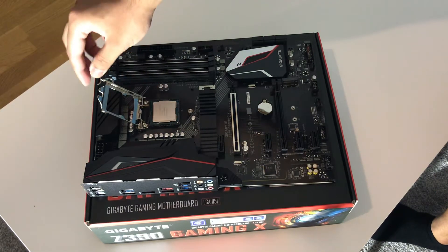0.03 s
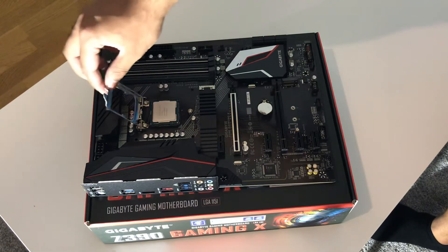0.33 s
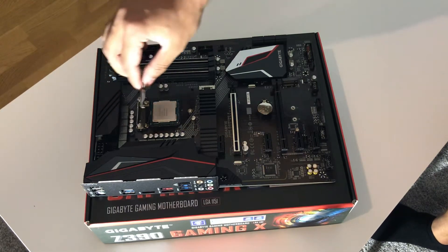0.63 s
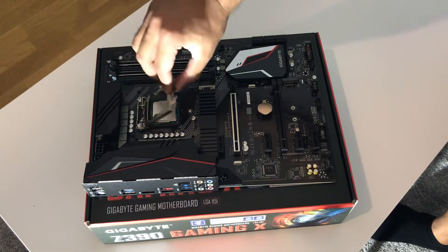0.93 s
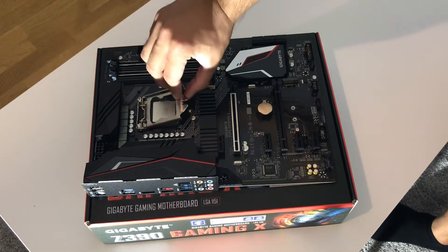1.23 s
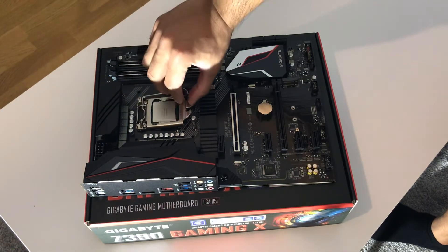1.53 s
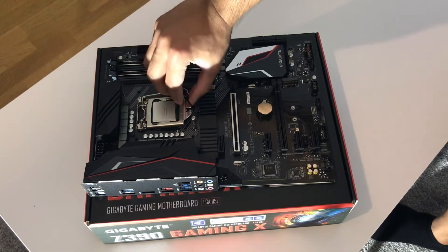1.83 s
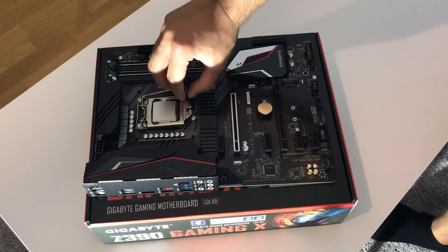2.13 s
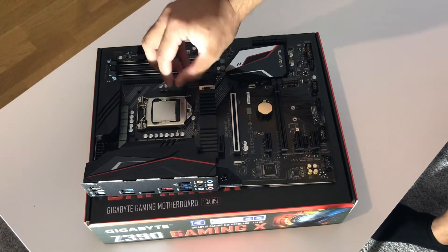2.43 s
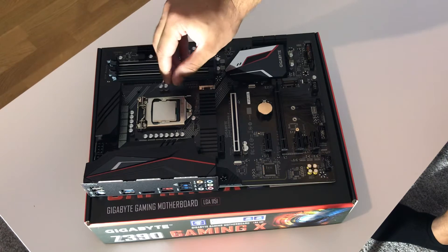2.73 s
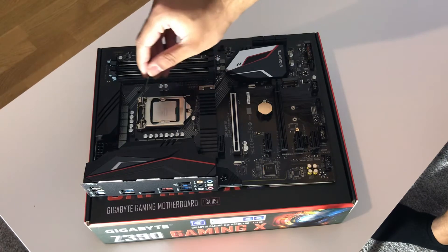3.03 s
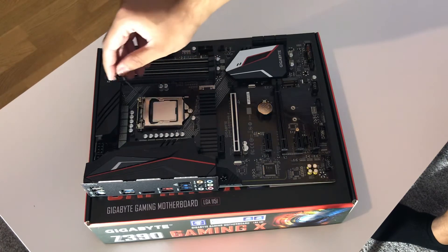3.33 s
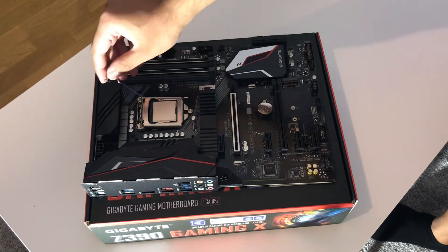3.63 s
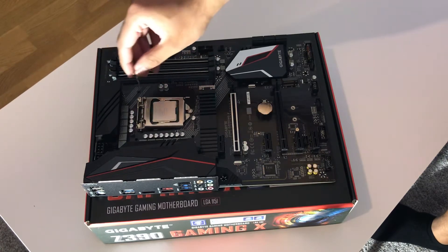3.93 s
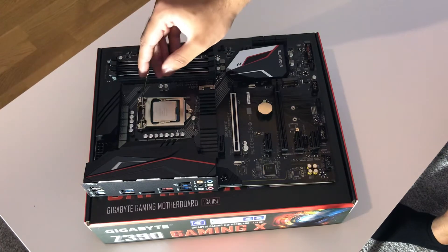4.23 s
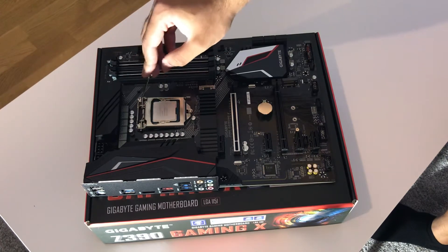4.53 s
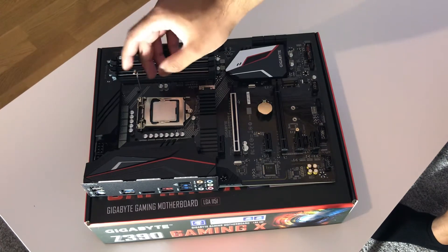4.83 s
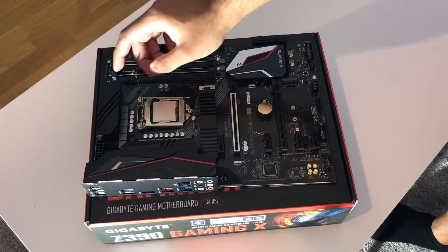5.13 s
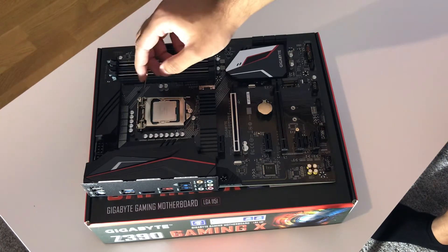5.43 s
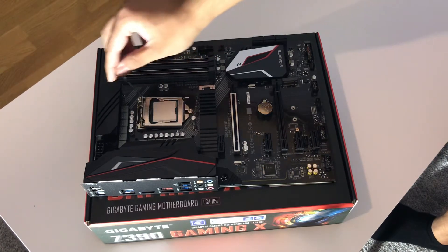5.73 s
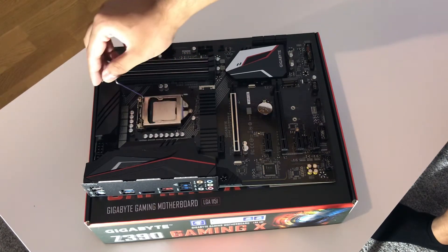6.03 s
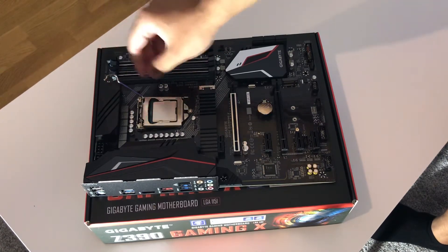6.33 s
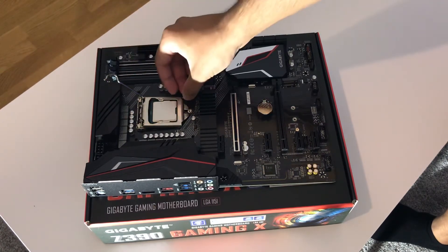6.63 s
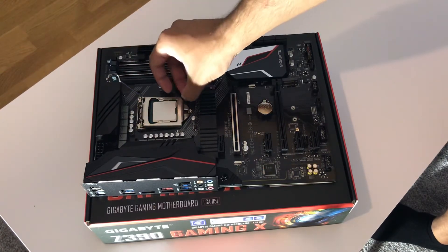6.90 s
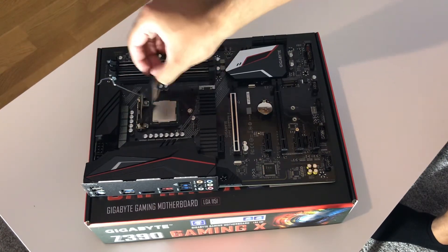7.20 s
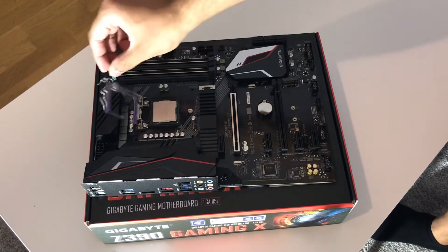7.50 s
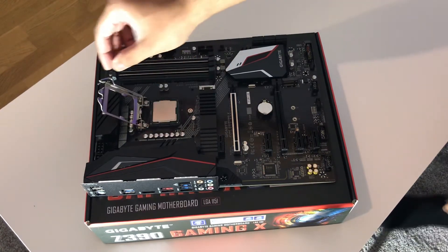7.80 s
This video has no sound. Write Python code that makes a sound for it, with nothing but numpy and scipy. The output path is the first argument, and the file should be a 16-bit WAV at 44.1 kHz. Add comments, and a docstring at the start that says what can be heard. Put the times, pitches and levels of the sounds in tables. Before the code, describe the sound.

Light metal clicks and snaps of a processor socket's plate and lever, worked by hand in a small quiet room.

```python
"""The steel plate and wire lever of a processor socket click and snap as a hand works them.
Each contact is a short chatter of tiny impacts that rings the plate, the lever and the circuit board.
The plate rubs in its hinge and finally swings open against its stop. Fingertips knock softly on the
board, and some blows boom in the cardboard box under it. One microphone hears it all in a small,
quiet room with a faint electronic whine."""
import sys
import numpy as np
from scipy import signal
from scipy.fft import rfft, irfft, next_fast_len
from scipy.io import wavfile
from scipy.ndimage import uniform_filter1d

SR = 44100
rng = np.random.default_rng(int(sys.argv[2]) if len(sys.argv) > 2 else 0)


def bounce(signal):
    """Save signal as a 16-bit WAV file at the path given by the first command-line argument."""
    frames = np.transpose(np.atleast_2d(signal))
    limited = np.clip(frames, -1, 1)
    pcm = np.round(limited * 32767).astype(np.int16)
    wavfile.write(sys.argv[1], SR, pcm)


N = 355490
RING_SAMPLES = 8192  # length of one ring of the steel or the board
TOP_HZ = 15900  # upper edge of the clicks and of the recorder


def undb(db):
    """Turn decibels into a number to multiply by."""
    return 10 ** (np.asarray(db) / 20)


def unit(x):
    """Scale each row to an average (rms) level of 1."""
    return x / np.sqrt(np.mean(x ** 2, axis=-1, keepdims=True))


def colour(x, points):
    """Make lows and highs louder or softer along a curve of (pitch_hz, level_db) points."""
    hz, db = np.transpose(points)
    freqs = np.maximum(np.fft.rfftfreq(len(x), 1 / SR), 1)
    gain = undb(np.interp(np.log(freqs), np.log(hz), db))
    return irfft(rfft(x) * gain, len(x))


def fade(t, ring_s):
    """A free vibration dies away, losing 60 dB in ring_s seconds."""
    return np.exp(-np.log(1000) * t / ring_s)


def even(x, width_hz):
    """Spread a burst's energy evenly from low to high, keeping only ripples finer than width_hz."""
    spectrum = rfft(x, 2 * len(x))
    width_bins = max(1, int(width_hz * 2 * len(x) / SR))
    power = uniform_filter1d(np.abs(spectrum) ** 2, width_bins)
    return irfft(spectrum / np.sqrt(np.abs(power) + 1e-12))[:len(x)]


def dying_noise(points, low_ring_s, high_ring_s, size):
    """Countless overlapping tones blur into noise; lows and highs each fade at their own rate."""
    t = np.arange(size) / SR
    freqs = np.fft.rfftfreq(size, 1 / SR)
    spectrum = rfft(rng.standard_normal(size))
    edges_hz = np.r_[0, np.geomspace(150, SR / 2, 8)]
    ring_times = np.geomspace(low_ring_s, high_ring_s, len(edges_hz) - 1)
    ring = sum(irfft(spectrum * (freqs >= low) * (freqs < high), size) * fade(t, ring_s)
               for low, high, ring_s in zip(edges_hz, edges_hz[1:], ring_times))
    flat = even(ring, width_hz=130)
    return colour(np.pad(flat, (0, size)), points)[:size]


def ringing_tones(pitch_hz, gain, ring_s, count, scatter_db, detune=0.0037):
    """An object's own fading tones, one row per blow: each spot that is hit mixes them differently."""
    t = np.arange(RING_SAMPLES) / SR
    detuned_hz = pitch_hz * (1 + detune * rng.standard_normal(len(pitch_hz)))
    tones = np.exp(2j * np.pi * detuned_hz[:, None] * t) * fade(t, ring_s[:, None])
    chance = rng.standard_normal((count, len(pitch_hz), 2))
    strength = gain * undb(scatter_db * chance[..., 0])
    phase = np.exp(2j * np.pi * chance[..., 1])
    return ((strength * phase) @ tones).imag


def stroke(start_s, length_s):
    """Pressure that swells and lets go."""
    return np.sin(np.pi * np.clip((np.arange(N) / SR - start_s) / length_s, 0, 1))


def slips(per_s, uneven_db):
    """Rubbing surfaces stick and slip, making many random ticks of uneven size."""
    ticks = (rng.random(N) < per_s / SR) * rng.standard_normal(N)
    return ticks * undb(uneven_db * rng.standard_normal(N))


def background(air_db=-67, whine_db=-85, whine_hz=11865, waver_hz=35, whine_end_s=6.5):
    """Steady room air and hiss, with a thin electronic whine that wavers in pitch and fades out."""
    # tone colour of room air and microphone hiss: pitch_hz, level_db
    air_colour = [(22, -43.5), (35, -14), (55, -4), (110, -3), (170, -4.5), (330, -8.5), (600, -15.5),
                  (1200, -17.5), (3000, -22.5), (6000, -26.5), (9500, -28.5), (10700, -32), (12000, -26),
                  (16000, -31.5)]
    air = unit(colour(rng.standard_normal(next_fast_len(N)), air_colour))[:N]
    slow_filter = signal.butter(2, 20, fs=SR, output="sos")
    waver = unit(signal.sosfilt(slow_filter, rng.standard_normal(N)))
    whine = unit(np.sin(2 * np.pi * np.cumsum(whine_hz + waver_hz * waver) / SR))
    fade_out = np.clip(2 * (whine_end_s - np.arange(N) / SR), 0, 1)
    return undb(air_db) * air + undb(whine_db) * whine * fade_out


def room(x, echo_db=-4, build_s=0.003):
    """The desk and near walls answer within milliseconds, then blur into a short echo."""
    # tone colour of the echo: pitch_hz, level_db
    echo_colour = [(60, 0), (150, 4), (300, 0), (700, 3), (1500, 0), (3500, -7), (7000, -3.5), (16000, -15)]
    tail = dying_noise(echo_colour, low_ring_s=0.49, high_ring_s=0.31, size=SR // 2)
    t = np.arange(len(tail)) / SR
    tail *= 1 - np.exp(-(t / build_s) ** 2)
    return x + undb(echo_db) * signal.fftconvolve(x, tail)[:N]


def box_boom():
    """Some blows pass through the board and make the hollow cardboard box boom."""
    # the box's low tones: pitch_hz, level_db, ring_s
    box_tones = [(150, 1, 0.2), (208.2, -2, 0.39), (282, 2.5, 0.13)]
    # blows that shake the whole box: start_s, level_db
    thumps = [(0.776, -61), (3.332, -51), (3.618, -56.5), (7.516, -43)]
    out = np.zeros(N + SR)
    t = np.arange(SR // 2) / SR
    boom = sum(undb(db) * np.sin(2 * np.pi * hz * t) * fade(t, ring_s) for hz, db, ring_s in box_tones)
    for start_s, level_db in thumps:
        at = int(start_s * SR)
        out[at:at + len(t)] += undb(level_db) * boom
    return out[:N]


def fingers(sharpness=2.4):
    """Soft skin stirs only one low, hollow tone of the board."""
    # fingertip knocks and rubs: start_s, length_s, pitch_hz, level_db
    touches = [(0.336, 0.045, 388, -50), (0.862, 0.072, 367, -68.5), (1.292, 0.028, 414, -59),
               (1.501, 0.044, 353, -61), (1.69, 0.14, 418, -66), (6.441, 0.033, 375, -49),
               (6.721, 0.039, 390, -60), (7.184, .025, 400, -52.5), (7.235, 0.067, 300, -50.5)]
    skin = slips(per_s=470, uneven_db=-2.0)
    out = np.zeros(N)
    for start_s, length_s, pitch_hz, level_db in touches:
        peak = signal.iirpeak(pitch_hz, sharpness, fs=SR)
        hollow = signal.lfilter(*peak, signal.lfilter(*peak, skin))
        out += undb(level_db) * stroke(start_s, length_s) * unit(hollow)
    return out


def scraping(ring_s=0.026):
    """Steel slides on steel, and each tiny slip rings the plate briefly."""
    # slides in the hinge and latch: start_s, length_s, level_db
    scrapes = [(0.3, 0.15, -61), (0.614, 0.18, -57), (2.668, 0.11, -63), (4.756, 0.065, -58),
               (5.191, 0.056, -49.5), (5.535, 0.092, -61), (7.16, 0.097, -61), (7.244, 0.65, -61.5)]
    # tone colour of the sliding steel: pitch_hz, level_db
    rasp_colour = [(300, -3), (2500, -6), (3250, -2.5), (3700, 2), (4200, -8.5), (4750, -11.5),
                   (6000, -17.5), (8400, -11), (10000, -32), (13000, -13.5)]
    pressure = sum(undb(db) * stroke(start_s, length_s) for start_s, length_s, db in scrapes)
    ring = dying_noise(rasp_colour, low_ring_s=ring_s, high_ring_s=ring_s, size=RING_SAMPLES)
    rasp = signal.fftconvolve(slips(per_s=1900, uneven_db=4.5), ring)[:N]
    return pressure * unit(rasp)


def free_plate(shimmer_db=31):
    """Hanging free, the thin plate rings on after a jolt: a few bright tones in a dense shimmer."""
    # jolts to the plate: start_s, level_db
    jolts = [(.225, -62), (3.327, -50), (7.231, -47), (7.51, -25)]
    # the plate's bright tones: pitch_hz, level_db, ring_s
    plate_tones = [(1830, -9, 0.11), (2090, -4, 0.059), (3430, -12.5, 0.086), (4120, -5.5, 0.082),
                   (7450, -10, .08), (9000, -13, .08), (11540, -3.5, 0.1), (12600, -1.5, .08),
                   (13600, -6, .06), (14700, 5, .065)]
    # tone colour of the shimmer between them: pitch_hz, level_db
    shimmer_colour = [(3000, -18), (5000, -1), (9500, -8), (11000, -6.5), (11900, 5), (15000, -1.5),
                      (16000, -12.5)]
    out = np.zeros(N + RING_SAMPLES)
    pitch_hz, level_db, ring_s = np.transpose(plate_tones)
    rings = ringing_tones(pitch_hz, undb(level_db), ring_s, len(jolts), scatter_db=2.5, detune=0.0005)
    for (start_s, jolt_db), ring in zip(jolts, rings):
        shimmer = dying_noise(shimmer_colour, low_ring_s=0.18, high_ring_s=0.15, size=RING_SAMPLES)
        at = int(start_s * SR)
        out[at:at + RING_SAMPLES] += undb(jolt_db) * (ring + undb(shimmer_db) * shimmer)
    return out[:N]


def socket_ring(count, tones_db=-1):
    """The clamped socket and board answer each blow with a crack and a few clear tones."""
    # tones that stand out of the crack: pitch_hz, peak_db, ring_s
    socket_tones = [(208.8, 2.5, 0.43), (271.4, 0.5, 0.12), (387, 6.5, 0.058), (632, 0, 0.044),
                    (1035, 5, 0.048), (1592, 3.5, 0.11), (2044, 6.5, 0.012), (2074, 2, 0.02),
                    (2246, 7, 0.023), (2923, -1, 0.028), (3270, 1, 0.069), (3460, 9.5, 0.04),
                    (3632, 8, 0.019), (3880, 3, 0.012), (8530, -4, 0.024)]
    # tone colour of the crack, a crowd of quickly dying tones: pitch_hz, level_db
    crack_colour = [(100, -22), (260, -2.5), (540, -5), (1000, -2.5), (1350, -2.5), (2100, 2.5),
                    (2550, -4.5), (3650, 3.5), (4800, -6.5), (6400, -14.5), (8500, -14), (10700, -19),
                    (12500, -15.5), (16000, -17)]
    pitch_hz, peak_db, ring_s = np.transpose(socket_tones)
    # a longer ring needs less strength to reach the same peak in the spectrum
    gain = undb(peak_db + tones_db) * 2 * np.log(1000) / (ring_s * SR)
    cracks = np.array([dying_noise(crack_colour, low_ring_s=0.11, high_ring_s=0.013, size=RING_SAMPLES)
                       for _ in range(count)])
    return cracks + ringing_tones(pitch_hz, gain, ring_s, count, scatter_db=3.5)


def split_parts(x):
    """Split a sound into five equally strong ranges, low to high: box, board, lever, plate, tick."""
    edges_hz = (60, 480, 1300, 2700, 6000, TOP_HZ)
    filters = [signal.butter(3, band, "bandpass", fs=SR, output="sos")
               for band in zip(edges_hz, edges_hz[1:])]
    return [unit(signal.sosfilt(band_filter, x)) for band_filter in filters]


def chatter(chatter_s, first_blow=1.03, bounces=24):
    """A first blow with tiny bounces crowding behind it; a larger chatter_s spreads them out."""
    push = np.zeros(RING_SAMPLES // 4)
    delays_s = rng.gamma(2, size=bounces) * chatter_s
    at = np.minimum(delays_s * SR, len(push) - 1).astype(int)
    np.add.at(push, at, rng.standard_normal(bounces))
    push[0] += first_blow
    return even(push, width_hz=56)


def single_clicks(earliest_s=0.02, latest_s=0.035, settle_db=-16):
    """A part clicks, then settles with one fainter tick a random moment later."""
    # contacts of plate, lever and latch: start_s, level_db, thud_db, lever_db, tick_db, chatter_s
    contacts = [(0.2254, -51, -5.5, -10, -15, 0.00034), (0.2658, -55.5, -2, -3.5, -19, 0.00022),
                (0.3803, -63, 7, 0, -1.5, 0.0011), (0.7441, -56.5, .5, -0.5, -6, 0.0027),
                (0.7716, -57.5, -9, -5, -22, .0004), (1.0995, -63.5, 0.5, 3, -6, 0.00041),
                (1.539, -66.5, 1, -2, -3, 0.0032), (2.04, -58, -7, -7, -5.5, .0005),
                (2.09, -64.5, -14, -4.5, -22, 0.00076), (2.3929, -60.5, 6, -1.5, -1.5, 0.0021),
                (2.485, -65, 6.5, 5, -1.5, .0028), (2.6806, -57, -2.5, -5, -6, 0.00084),
                (2.7353, -65.5, 6, 6.5, -8, 0.00038), (2.7806, -59, -6.5, -4, -8, 0.00044),
                (2.802, -62.5, -4, -5, -6, .0003), (3.1253, -49.5, -2, 2, -2.5, 0.00064),
                (3.5924, -59, -1, -11, -7, .0008), (3.6092, -46.5, 0, 2.5, -9, .0022),
                (3.7317, -59.5, -0.5, 2.5, -3, .0018), (3.866, -63, 1, 5.5, -2.5, 0.00035),
                (3.9522, -57, -4, -15, -1.5, .0003), (4.0217, -56, 4.5, 1.5, -3.5, 0.00038),
                (4.7289, -60.5, -18, -17, -5, 0.00032), (4.759, -59, -3.5, 1, -6, .0008),
                (4.7929, -55, -3, -3, -7, 0.0019), (5.6424, -64.5, 6.5, -2, 0, 0.0012),
                (5.7644, -58, 1.5, -5, -4.5, 0.0014), (6.452, -55, 2, -1, -8.5, .0013),
                (6.7539, -67.5, 8.5, -1.5, -7, .0005), (6.8259, -54.5, -3.5, 3, -9.5, 0.00036),
                (7.1195, -58, 3.5, 3.5, 0.5, .0006), (7.205, -50.5, 1, 2, -3, 0.00096),
                (7.229, -39.5, -6, -4.5, -3.5, .0014), (7.3165, -60.5, 3.5, 3, -9, 0.00064),
                (7.386, -52.5, -1.5, -3, -6, .001), (7.4236, -52.5, -1, -5, -7.5, .0008)]
    for start_s, level_db, *tone in contacts:
        yield start_s, level_db, *tone
        yield start_s + rng.uniform(earliest_s, latest_s), level_db + settle_db, *tone


def catches(touch_db=-56.5, tick_db=-6.5, touch_chatter_s=0.001, seat_chatter_s=0.0019):
    """A part touches lightly, then slips into its seat with a longer grind."""
    # double clicks: start_s, slip_s, seat_db, thud_db, lever_db
    double_clicks = [(3.0341, 0.0086, -53.5, -3, 1), (5.5701, 0.0068, -45, -9, -4),
                     (5.6822, 0.012, -51.5, -0.5, 5), (5.7768, .0131, -47.5, 0, 2),
                     (6.9255, 0.0065, -55, 1, 3), (7.061, 0.015, -50.5, 0, 1.5)]
    for start_s, slip_s, seat_db, *tone in double_clicks:
        yield start_s, touch_db, *tone, tick_db, touch_chatter_s
        yield start_s + slip_s, seat_db, *tone, tick_db, seat_chatter_s


def snaps(bounce_chatter_s=0.0012):
    """Springy steel hits its stop hard and bounces twice, the second time a little more weakly."""
    # hard blows: start_s, level_db, thud_db, lever_db, tick_db, chatter_s, bounce_s, bounce_db
    blows = [(3.328, -36, -0.5, -0.5, -11.5, .0006, 0.03, -16.5),
             (5.1978, -44.5, -10, -6, -4.5, 0.0017, 0.0088, -3), (6.0642, -37, 0, 1, -5, .0013, .015, -21),
             (7.5079, -26, -9, -4.5, -5.5, .0018, .016, -10.5)]
    for start_s, level_db, *tone, chatter_s, bounce_s, bounce_db in blows:
        yield start_s, level_db, *tone, chatter_s
        yield start_s + bounce_s, level_db + bounce_db, *tone, bounce_chatter_s
        yield start_s + 3 * bounce_s, level_db + bounce_db - 1, *tone, bounce_chatter_s


def socket_clicks(box_lag_s=0.001904, box_db=-3, board_db=-5.5, boost_db=3.5):
    """Every contact rings steel and board at once; the box underneath follows a moment later."""
    out = np.zeros(N + 2 * RING_SAMPLES)
    contacts = [*snaps(), *catches(), *single_clicks()]
    pushes = np.array([chatter(chatter_s) for *_, chatter_s in contacts])
    rings = signal.fftconvolve(socket_ring(len(contacts)), pushes, axes=1)[:, :RING_SAMPLES]
    for contact, box, board, lever, plate, tick in zip(contacts, *split_parts(rings)):
        start_s, level_db, thud_db, lever_db, tick_db, _ = contact
        steel = plate + undb(lever_db) * lever + undb(tick_db) * tick
        thud = undb(thud_db + board_db) * board
        at, box_at = int(start_s * SR), int((start_s + box_lag_s) * SR)
        out[at:at + RING_SAMPLES] += undb(level_db) * (steel + thud)
        out[box_at:box_at + RING_SAMPLES] += undb(level_db + thud_db + box_db) * box
    # a click's level counts its energy as if spread over 10 ms
    return out[:N] * np.sqrt(0.01 * SR / RING_SAMPLES) * undb(boost_db)


def scene():
    """The handled socket echoes in its room, over the quiet background."""
    handling = socket_clicks() + free_plate() + box_boom() + scraping() + fingers()
    return (room(handling) + background())[None]


def record(dry):
    """The small microphone drops the deepest bass; the recorder cuts the highest treble."""
    bass_cut = signal.butter(4, 38, "highpass", fs=SR, output="sos")
    treble_cut = signal.ellip(10, 0.2, 70, TOP_HZ, fs=SR, output="sos")
    return signal.sosfilt(treble_cut, signal.sosfilt(bass_cut, dry))


dry = scene()
out = record(dry)
bounce(out)
```